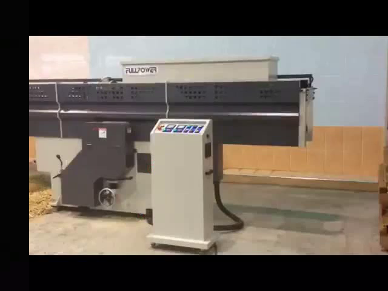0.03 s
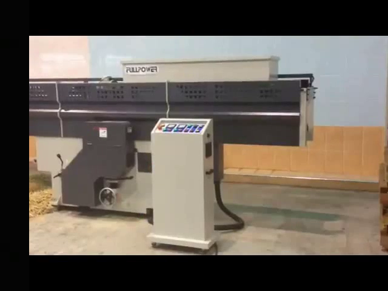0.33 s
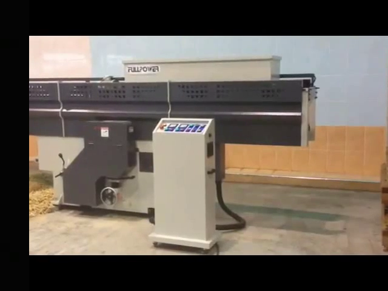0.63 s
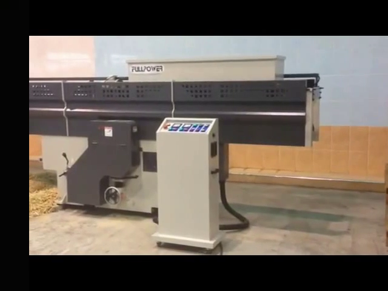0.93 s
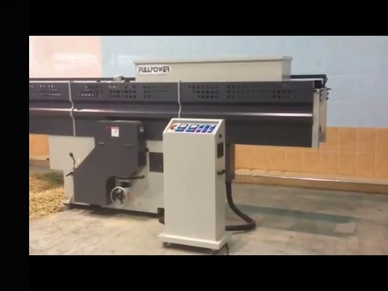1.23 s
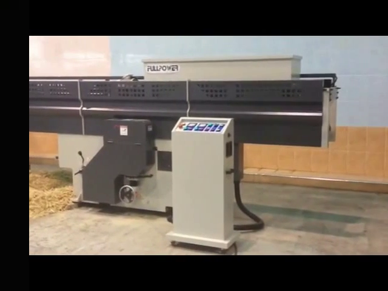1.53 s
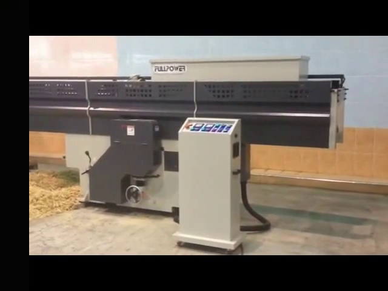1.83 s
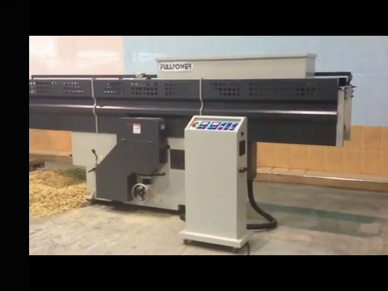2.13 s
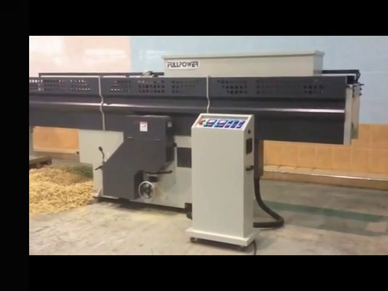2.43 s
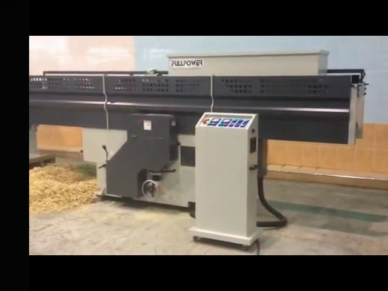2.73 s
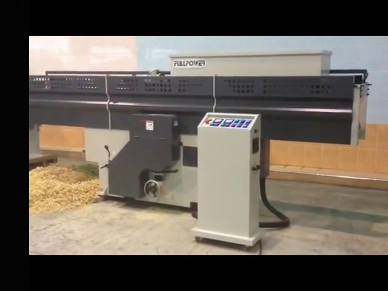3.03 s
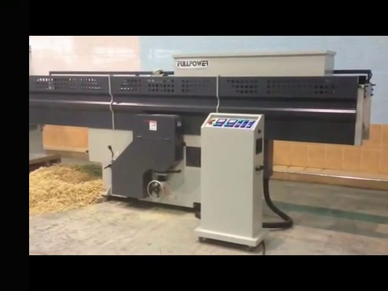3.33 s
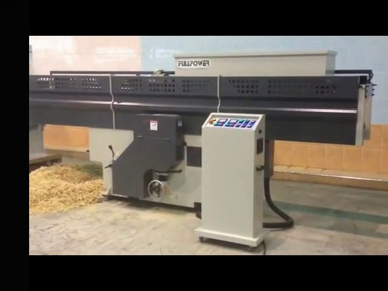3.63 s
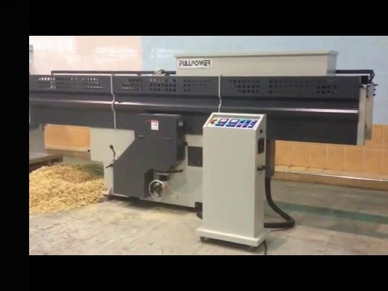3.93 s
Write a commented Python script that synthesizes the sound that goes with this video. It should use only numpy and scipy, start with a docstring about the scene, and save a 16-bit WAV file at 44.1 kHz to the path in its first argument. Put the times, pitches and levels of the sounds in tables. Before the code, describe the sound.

A wood shaving machine drones loudly, whistling, squeaking and twice rasping into wood.

```python
"""A loud, steady drone cuts in: a wood shaving machine is running in a tiled workshop.
Its cutter head drones at the rate the knives pass, over motor hum and a roar of churned air. The
drone's tones swell and fade as the microphone drifts through the room's standing waves (its loud and
quiet spots). The sliding feed box whistles and squeaks. Halfway through, the sound drops out for an
instant; then the knives bite into the wood twice with a rasp, the second time with a crack."""
import sys
import numpy as np
from scipy import signal
from scipy.fft import rfft, irfft, next_fast_len
from scipy.io import wavfile
from scipy.ndimage import uniform_filter1d, map_coordinates

SR = 44100
rng = np.random.default_rng(int(sys.argv[2]) if len(sys.argv) > 2 else 0)


def to_wav(s):
    """Save 16-bit WAV."""
    ch = np.atleast_2d(s).T  # columns
    pcm = np.round(np.clip(ch, -1, 1) * 32767)  # PCM
    wavfile.write(sys.argv[1], SR, pcm.astype(np.int16))


N = 176400  # 4 seconds


def amp(db):
    """Turn decibels into a number to multiply by."""
    return 10 ** (np.asarray(db) / 20)


def unit(x):
    """Scale a signal to an average strength (rms) of 1."""
    return x / np.sqrt(np.mean(x ** 2) + 1e-20)


def clock():
    """The time of every sample, in seconds."""
    return np.arange(N) / SR


def along(points, hz):
    """Read a (frequency, value) table at hz, on a log frequency axis."""
    freqs, values = np.transpose(points)
    return np.interp(np.log(hz + 1), np.log(freqs + 1), values)


def curve(rows):
    """Join (time, value) points with straight lines."""
    return np.interp(clock(), *np.transpose(rows))


def wobble(rate):
    """A smooth curve through `rate` random values a second."""
    return map_coordinates(rng.standard_normal(2048), [clock() * rate + 2], mode="wrap")


def filtered(x, response):
    """Turn each frequency in x up or down by response(hz)."""
    size = next_fast_len(N + SR // 2)
    hz = np.fft.rfftfreq(size, 1 / SR)
    return irfft(rfft(x, size) * response(hz), size)[..., :N]


def tone(phase, scatter, rate):
    """A stereo tone that echoes make flutter: scatter sets how much, rate how fast."""
    echo = 1 + scatter * (wobble(rate) + 1j * wobble(rate))
    ear_shift = .03 * wobble(1) * np.array([[1], [-1]])
    wave = np.exp(1j * (phase + ear_shift + rng.uniform(0, 2 * np.pi)))
    return unit(np.real(echo * wave))


# Strong drone tones, at 1, 2, 3 and 5 times the knife rate (time [s], level [dB])
FIRST_HARMONIC = [(.15, -31.5), (.7, -32), (1.27, -33), (1.4, -44.5), (2.3, -43), (2.55, -37), (2.7, -40.5),
                  (3.05, -36), (3.3, -32.5), (3.9, -32), (4, -32)]
SECOND_HARMONIC = [(.15, -31), (.35, -32), (.6, -41.5), (.8, -34), (1.1, -27.5), (1.5, -24), (1.8, -25),
                   (2.05, -26), (2.35, -31), (2.55, -36.5), (2.65, -47.5), (2.8, -34), (3.1, -27),
                   (3.5, -24), (3.8, -24), (4, -27.5)]
THIRD_HARMONIC = [(.15, -35), (.38, -45), (.7, -38.5), (1, -33), (1.2, -33.5), (1.5, -38.5), (1.72, -49),
                  (2, -35), (2.35, -32.5), (2.75, -36), (3.02, -44), (3.3, -36), (3.8, -33), (4, -34.5)]
FIFTH_HARMONIC = [(.15, -43.5), (.4, -39.5), (.65, -40), (.82, -53), (1.08, -39.5), (1.3, -40.5),
                  (1.55, -51), (1.75, -40), (2, -38.5), (2.3, -52), (2.5, -42), (2.72, -38), (3.03, -47),
                  (3.35, -42), (3.9, -48)]
# Weaker drone tones (multiple of the knife rate, level [dB])
WEAK_HARMONICS = [(4, -51), (6, -50.5), (7, -49), (8, -47), (9, -50.5), (11, -57), (12, -58.5)]
THROB_HZ, THROB_PEAK_S, THROB_DEPTH = 5.46, .165, 0.26

def cutter_drone(knife_phase):
    """Passing knives make a stack of tones, each fading on its own in the standing waves."""
    # the lowest tone throbs as it beats against the drive
    throb = 1 + THROB_DEPTH * np.cos(2 * np.pi * THROB_HZ * (clock() - THROB_PEAK_S))
    drone = amp(curve(FIRST_HARMONIC)) * throb * tone(knife_phase, scatter=0.13, rate=12)
    drone += amp(curve(SECOND_HARMONIC)) * tone(2 * knife_phase, scatter=0.091, rate=16)
    drone += amp(curve(THIRD_HARMONIC)) * tone(3 * knife_phase, scatter=0.086, rate=11)
    drone += amp(curve(FIFTH_HARMONIC)) * tone(5 * knife_phase, scatter=0.047, rate=12)
    for multiple, db in WEAK_HARMONICS:
        drone += amp(db + 3.56 * wobble(3.9)) * tone(multiple * knife_phase, scatter=0.057, rate=14)
    return drone


# Tones of motors, belts and bearings (pitch [Hz], level [dB])
HUM_TONES = [(157.6, -50.5), (360, -52.5), (391.4, -50), (413, -46.5), (424, -63.5), (482.5, -45.5),
             (782.2, -49.5), (2050, -52)]
# The drive's strongest tone (time [s], level [dB])
DRIVE_LEVEL = [(.15, -54), (.6, -42), (.85, -41), (1.25, -35), (1.42, -47), (1.66, -31.5), (1.85, -47.5),
               (2.4, -46), (3.3, -40.5), (3.52, -47.5), (3.75, -38), (4, -45.5)]
DRIVE_HZ = 240.4

def motor_hum():
    """The spinning parts of the drive hum with fluttering tones."""
    turn = 2 * np.pi * clock()
    hum = sum(amp(db) * tone(hz * turn, scatter=0.65, rate=11) for hz, db in HUM_TONES)
    return hum + amp(curve(DRIVE_LEVEL)) * tone(DRIVE_HZ * turn, scatter=0.43, rate=9.7)


# How alike the noise is on the left and right (frequency [Hz], likeness [0 to 1])
STEREO_LIKENESS = [(30, 0.46), (120, 0.99), (400, 0.99), (1000, 0.98), (2500, 0.98), (4500, 0.94),
                   (8000, 0.96), (12000, 0.31)]

def room_noise(spectrum, patchy_db, ripple_db):
    """Stereo noise with passing loud patches and the fixed peaks and dips of a hard room."""
    grid = signal.stft(rng.standard_normal((2, N)), nperseg=512)[2]
    patches = uniform_filter1d(rng.standard_normal(grid.shape[1:]), size=5, axis=0)  # across pitch
    patches = uniform_filter1d(patches, size=12, axis=1)  # across time
    noise = signal.istft(grid * amp(patchy_db * unit(patches)), nperseg=512)[1][:, :N]
    room_peaks = rng.standard_normal(2048)

    def colour(hz):
        ripple = ripple_db * map_coordinates(room_peaks, [hz / 14], mode="wrap")  # a value per 14 Hz
        width = np.arccos(np.clip(along(STEREO_LIKENESS, hz), -1, 1)) / 2
        return amp(along(spectrum, hz) + ripple) * [np.cos(width), np.sin(width)]

    mid, side = filtered(noise, colour)
    return unit(np.array([mid + side, mid - side]))


# Tone colour of the housing's rumble and of the churned air (frequency [Hz], relative level [dB])
RUMBLE_SPECTRUM = [(25, -29), (45, -27), (65, -25), (85, -21.5), (110, -10.5), (135, -3.5), (200, -2),
                   (300, 1), (420, 0.5), (520, -8.5), (700, -13), (1500, -43), (9500, -34), (11000, -100)]
AIR_SPECTRUM = [(150, -41.5), (450, -3), (650, 2.5), (900, 4), (1080, 1.5), (1250, -2.5), (1480, -2.5),
                (1680, 0), (1950, 0.5), (2450, 1.5), (2750, -1.5), (3150, -6.5), (3450, -4), (3700, -9),
                (4300, -3), (5100, -7), (5900, -13.5), (6900, -8), (7700, -13.5), (9000, -15), (9800, -23),
                (10400, -27.5), (11000, -100)]
# How loud each of the two is (time [s], level [dB])
RUMBLE_LOUDNESS = [(.15, -31), (.8, -34), (1.3, -33.5), (1.9, -34), (2.4, -32.5), (3, -35), (3.5, -32.5),
                   (4, -33)]
AIR_LOUDNESS = [(.15, -31.5), (.7, -32), (1.5, -33), (2.1, -32), (2.7, -32.5), (3.3, -32), (4, -32)]

def roar(knife_phase, chop_depth=0.099):
    """The housing rumbles, and each passing knife chops the rushing air."""
    rumble_gain = amp(curve(RUMBLE_LOUDNESS) + .6 * wobble(8))
    rumble = rumble_gain * room_noise(RUMBLE_SPECTRUM, patchy_db=1, ripple_db=1.5)
    air_gain = amp(curve(AIR_LOUDNESS) + 0.6 * wobble(11))
    air = air_gain * room_noise(AIR_SPECTRUM, patchy_db=1.24, ripple_db=1.5)
    return rumble + air * (1 + chop_depth * np.cos(knife_phase))


# The feed box's long whistle (time [s], level [dB])
WHISTLE_LEVEL = [(.15, -49), (.6, -47), (1.05, -47), (1.25, -40.5), (1.5, -38), (1.72, -39), (1.81, -55),
                 (1.86, -47), (1.92, -42), (1.99, -46), (2.12, -44), (2.4, -52), (2.8, -68), (4, -90)]
# The scraping hiss around it (frequency [Hz], relative level [dB])
SCRAPE_SPECTRUM = [(2500, -45), (3600, -23), (4000, -8), (4170, -6.5), (4400, -11), (5200, -19),
                   (8000, -32), (10500, -69), (11500, -100)]
WHISTLE_HZ = 4138

def feed_box_whistle(overtone_db=-23, scrape_db=-4.5):
    """The feed box rubs as it slides, making one long whistle inside a hiss."""
    phase = 2 * np.pi * WHISTLE_HZ * clock()
    overtone = amp(overtone_db) * tone(3 * phase, scatter=.6, rate=60)
    scrape = amp(scrape_db) * room_noise(SCRAPE_SPECTRUM, patchy_db=2.5, ripple_db=-0.5)
    whistle = tone(phase, scatter=0.17, rate=40)
    return amp(curve(WHISTLE_LEVEL)) * (whistle + overtone + scrape)


SQUEAK_HZ, CHIRP_HZ, PEEP_HZ = 5556, 8080, 15190
# Short squeaks at those pitches (start [s], length [s], pitch [Hz], level [dB])
METAL_SQUEAKS = [(.55, 0.18, SQUEAK_HZ, -47.5), (.565, 0.13, CHIRP_HZ, -50), (.77, 0.11, SQUEAK_HZ, -46.5),
                 (.91, 0.22, SQUEAK_HZ, -51), (3.548, 0.15, PEEP_HZ, -61)]

def feed_box_squeaks():
    """Sliding metal rubs out short squeaks that swell and fade."""
    t = clock()
    squeaks = np.zeros((2, N))
    for start, length, hz, db in METAL_SQUEAKS:
        progress = np.clip((t - start) / length, 0, 1)
        arch = 2 * np.sqrt(progress * (1 - progress))
        squeaks += amp(db) * arch * tone(2 * np.pi * hz * t, scatter=.35, rate=70)
    return squeaks


# Bites into the wood (start [s], rise [s], hold [s], fade [dB per s], level [dB])
KNIFE_BITES = [(2.147, 0.27, 0.25, 17, -37), (3.068, 0.025, 0.15, 28, -28)]
# Tone colour of chips tearing off (frequency [Hz], relative level [dB])
CHIP_SPECTRUM = [(400, -28), (1200, -8.5), (1900, 4), (2600, 4), (3100, -1), (3600, 2), (4700, 1.5),
                 (5900, -5.5), (7100, -5.5), (8000, -12.5), (9200, -18), (10200, -62), (11000, -110)]

def shaving(knife_phase, rasp_db=1, chop_depth=0.3):
    """Each bite rasps up, holds and dies away, pulsed by the passing knives."""
    t = clock()
    gain = np.zeros(N)
    for start, rise, hold, fade, db in KNIFE_BITES:
        fading_s = np.maximum(t - start - rise - hold, 0)
        gain += amp(db - fade * fading_s) * np.clip((t - start) / rise, 0, 1)
    rasp = unit(amp(rasp_db * wobble(380)))  # fibres tear unevenly
    chop = 1 + chop_depth * np.cos(knife_phase)
    return gain * rasp * chop * room_noise(CHIP_SPECTRUM, patchy_db=0.5, ripple_db=2.1)


# Tone colour of cracking wood (frequency [Hz], relative level [dB])
CRACK_SPECTRUM = [(1500, -20), (3000, -12), (4200, 4.5), (7000, -2.5), (9000, -16), (11000, -80)]

def splinter(start_s=3.083, level_db=-26, fade_s=0.02):
    """A short crack as the knives catch the wood in the deepest bite."""
    age = clock() - start_s
    gain = (age > 0) * amp(level_db - 60 * np.abs(age) / fade_s)
    return gain * room_noise(CRACK_SPECTRUM, patchy_db=2.0, ripple_db=11.0)


KNIFE_HZ = 315.45  # knives passing per second

def scene():
    """Add up the sounds; one almost steady cutter speed drives the drone, roar and shaving."""
    knife_phase = 2 * np.pi * np.cumsum(KNIFE_HZ + .12 * wobble(3.04)) / SR
    machine = cutter_drone(knife_phase) + motor_hum() + roar(knife_phase)
    wood = shaving(knife_phase) + splinter()
    return machine + wood + feed_box_whistle() + feed_box_squeaks()


# A slight lean to the right (frequency [Hz], left minus right [dB])
LEFT_RIGHT_BALANCE = [(200, 0), (600, -.05), (1200, -.6), (8000, -.8)]
START_S, LEAD_IN_S = .146, 0.025
SKIP_AT_S, SKIP_S = 1.092, .0006
DROP_FROM_S, DROP_TO_S, DROP_DB = 2.0555, 2.0785, -23.5
LOW_CUT_HZ, TOP_HZ = 71, 15300

def record(dry):
    """The sound cuts in, skips once, drops out briefly, leans right and loses its lows and very top."""
    t = clock()
    after_skip = uniform_filter1d(1. * (t > SKIP_AT_S), size=200)
    delayed = np.roll(dry, round(SKIP_S * SR), axis=1)
    skipped = (1 - after_skip) * dry + after_skip * delayed
    muted = (t < START_S) | ((t > DROP_FROM_S) & (t < DROP_TO_S))
    fade_in = np.clip((t - START_S) / LEAD_IN_S + 1.2, 0, 1)
    gain = uniform_filter1d(np.where(muted, amp(DROP_DB), 1) * fade_in, size=24)
    balance = lambda hz: amp(along(LEFT_RIGHT_BALANCE, hz) * np.array([[.5], [-.5]]))
    band = lambda hz: 1j * hz / (1j * hz + LOW_CUT_HZ) * (hz < TOP_HZ)
    return filtered(skipped * gain, lambda hz: balance(hz) * band(hz))


dry = scene()
out = record(dry)
to_wav(out)
```